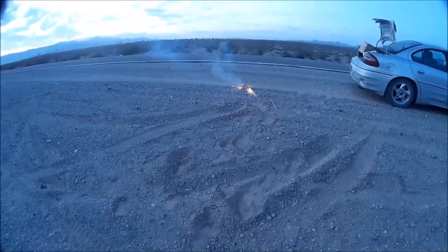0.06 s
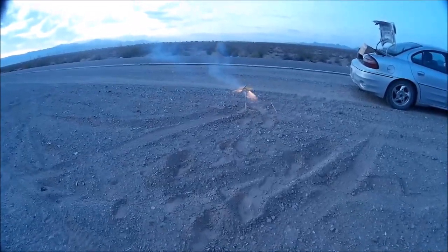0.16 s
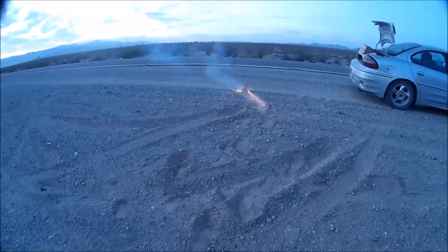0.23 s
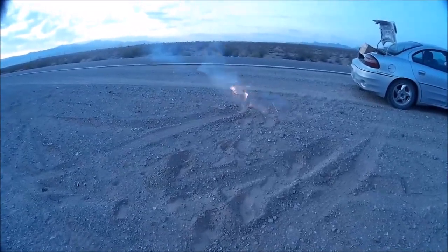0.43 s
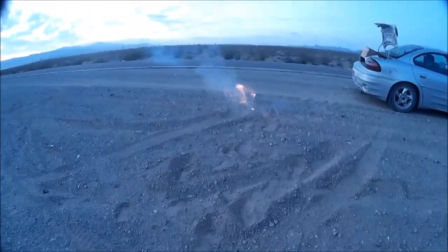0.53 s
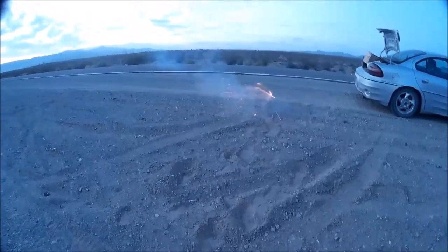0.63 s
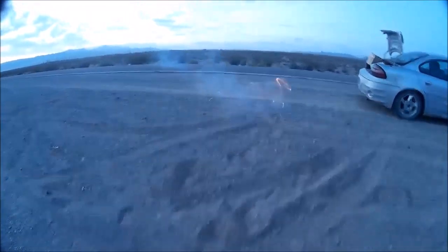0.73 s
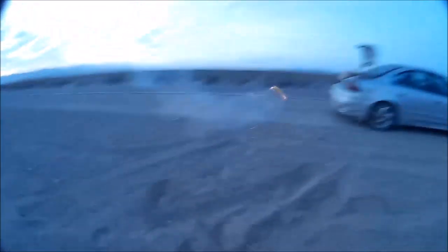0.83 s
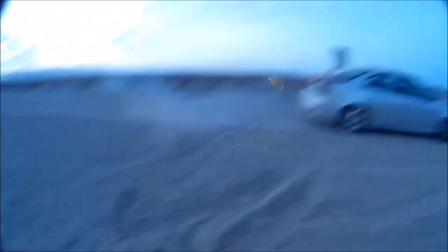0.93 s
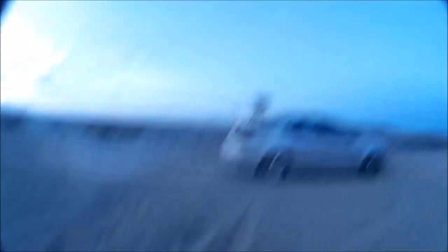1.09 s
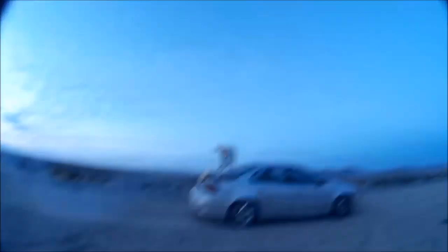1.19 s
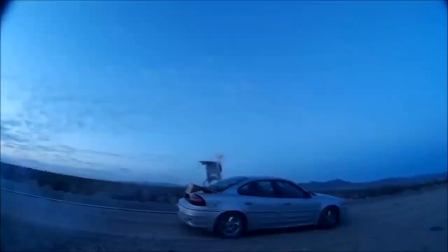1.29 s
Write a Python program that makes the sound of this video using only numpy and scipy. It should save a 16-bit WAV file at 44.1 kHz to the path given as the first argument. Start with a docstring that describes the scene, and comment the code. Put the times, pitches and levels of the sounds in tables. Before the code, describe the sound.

A small firework fizzes alight on the ground outdoors, then hisses in quickening surges with a rough howl and a few spitting pops. The rush dies down as it spins away from the microphone, leaving a bright fizz.

```python
"""A thin hiss swells to a surging, crackling rush: a spinning firework catches and flies away.
It starts on open gravel, heard from one fixed microphone in quiet evening air. The jet surges each time
the nozzle swings round, the flame howls, sparks fizz and the burning charge spits small pops.
The echo off the ground comes later as it climbs, which sweeps the colour of the rush downwards."""
import sys
import numpy as np
from scipy import signal
from scipy.fft import rfft, irfft
from scipy.io import wavfile

SR = 44100
rng = np.random.default_rng(int(sys.argv[2]) if len(sys.argv) > 2 else 0)


def file_out(sig):
    """Save sig as 16-bit WAV at sys.argv[1]."""
    # one column per channel
    cols = np.atleast_2d(sig).T
    # limit, then scale
    lim = np.clip(cols, -1, 1)
    pcm = np.round(lim * 32767).astype(np.int16)
    wavfile.write(sys.argv[1], SR, pcm)


N = 59535
T = np.arange(N) / SR

# colour of the jet's rush and the pops' cracks, as the microphone hears them: f/Hz, relative density/dB
RUSH_SPECTRUM = [(29, -59), (50, -24.5), (256, -39), (375, -19), (538, -8), (701, -7), (870, -3),
                 (1110, -1.5), (1470, -2.5), (1830, -4.5), (2020, -3), (2380, -4.5), (2820, -10.5),
                 (3580, -1), (3950, -0.5), (4670, -1), (7020, -12.5), (8110, -8), (9140, -15.5),
                 (10300, -5.5), (11300, -2), (13400, -12.5), (15500, -21)]


def from_db(db):
    """Decibels to gain."""
    return 10 ** (np.asarray(db) / 20)


def unit_rms(x):
    """Scale to an RMS of one."""
    return x / np.sqrt(np.mean(x ** 2) + 1e-20)


def in_time(rows):
    """Each column of a timed table at every sample."""
    times, *columns = np.transpose(rows)
    return [np.interp(T, times, column) for column in columns]


def coloured(noise, spectrum):
    """Give a steady noise a spectrum, at unit RMS."""
    hz, db = np.transpose(spectrum)
    bin_hz = np.maximum(np.arange(N // 2 + 1) * SR / N, 1)
    gain = from_db(np.interp(np.log(bin_hz), np.log(hz), db))
    return unit_rms(irfft(rfft(noise) * gain, N))


def butterworth(x, kind, hz, order=2):
    """A "low" or "high" pass filter."""
    return signal.sosfilt(signal.butter(order, hz, kind, fs=SR, output="sos"), x)


def split(x, hz):
    """The parts below and above a frequency; they add up to the whole."""
    low = signal.sosfiltfilt(signal.butter(3, hz, fs=SR, output="sos"), x)
    return low, x - low


def evening_air():
    """Faint hiss of the open site, and the low rumble of a breeze on the microphone."""
    # outdoor background: f/Hz, relative density/dB
    air_spectrum = [(15, -38), (25, -16), (113, -32), (144, -4), (160, 3), (313, 2), (433, -35), (552, -2),
                    (631, -7), (1490, -8.5), (2700, -22), (3630, -6), (6050, -24), (12200, -14),
                    (15500, -30)]
    rise_db_per_s, full_at_s = 29, 0.17   # the breeze picks up, then holds
    rumble = unit_rms(butterworth(rng.standard_normal(N), "low", hz=68))
    rumble_db = -55 + rise_db_per_s * np.minimum(T - full_at_s, 0)
    hiss = coloured(rng.standard_normal(N), air_spectrum)
    return from_db(-61.5) * hiss + from_db(rumble_db) * rumble


def turbulence():
    """Smooth gas noise mixed with the tiny cracks of burning grains."""
    cracks_per_s, spread_db = 2500, 2
    sizes = from_db(spread_db * np.minimum(rng.exponential(1, N), 5))
    signs = rng.choice([-1, 1], N)
    cracks = unit_rms(sizes * signs * (rng.random(N) < cracks_per_s / SR))
    return coloured(rng.standard_normal(N) + from_db(-6.5) * cracks, RUSH_SPECTRUM)


def jet():
    """The jet follows the uneven burn and surges on every turn, the treble most because it is beamed."""
    # course of the burn: t/s, level/dB, extra low roar/dB, extra top sizzle/dB
    burn = [(0, -75, 25.5, -6), (.12, -59.5, 11, -7), (.2, -42.5, 12, 4), (.25, -30, 4, 3),
            (.3, -13, -6.5, -6), (.36, -19, 7.5, -2.5), (.44, -12, 4, -2.5), (.49, -18, 4.5, -5),
            (.57, -21, -1.5, -2), (.64, -20.5, -2, -3), (.73, -18, -2, -1), (.85, -16, 13, -5),
            (.94, -25.5, 16.5, -0.5), (.948, -20, 10.5, -1), (1.01, -21.5, 10, 0), (1.08, -25.5, 4, 1.5),
            (1.16, -31, 5, 0), (1.35, -33.5, -1, 2)]
    # the nozzle swings towards the microphone: t/s, surge of the hiss band/dB, half-width/s
    turns = [(0.408, 9.5, 0.02), (.527, 11.5, .012), (0.602, 9.5, 0.01), (0.671, 6.5, 0.0082),
             (0.708, 8, 0.011), (0.763, 10.5, 0.014), (0.817, 12, 0.0084), (.867, 9, .011),
             (0.912, 13, 0.0084), (0.953, 8, 0.0077), (1.002, 8, 0.0094), (1.039, 10, 0.0076),
             (1.082, 6, 0.0065), (1.12, 4, 0.013)]
    level_db, roar_db, sizzle_db = in_time(burn)
    surge_db = sum(db * np.exp(-.5 * ((T - at) / width) ** 2) for at, db, width in turns)
    flutter_db = 1.64 * unit_rms(butterworth(rng.standard_normal(N), "low", hz=73))
    roar, rest = split(turbulence(), hz=810)
    rush, rest = split(rest, hz=2770)
    hiss, sizzle = split(rest, hz=6100)
    beamed = (roar * from_db(roar_db + 0.31 * surge_db)
              + (rush + hiss) * from_db(surge_db)
              + sizzle * from_db(sizzle_db + 1.192 * surge_db))
    return from_db(level_db + flutter_db) * beamed


def with_ground_echo(direct):
    """The gravel sends a dull echo to the microphone, later as the firework gains height."""
    # the echo's delay during the climb: t/s, lag/ms
    climb = [(.2, 0.61), (.27, 0.68), (.31, 0.47), (.35, 1.1), (.39, 1), (.45, 1.17), (.6, 1.37),
             (.72, 1.9), (.85, 2.11), (1.0, 2.65), (1.35, 3.44)]
    lag_ms, = in_time(climb)
    dull, _ = split(direct, hz=2290)
    return direct + 0.27 * np.interp(T - lag_ms / 1000, T, dull)


def resonance(track, half_width_hz):
    """A broad resonance, driven by turbulence, that wanders in pitch."""
    hz, db = in_time(track)
    a, b = butterworth(rng.standard_normal((2, N)), "low", half_width_hz)
    phase = 2 * np.pi * np.cumsum(hz) / SR
    return from_db(db) * unit_rms(a * np.cos(phase) + b * np.sin(phase))


def flame():
    """The flame sounds in three gliding bands of noise: a rush, a howl and the hiss of ignition."""
    # low rush of the flame: t/s, f/Hz, level/dB
    low_rush = [(.12, 400, -65.5), (.22, 420, -43), (.29, 380, -35), (.37, 250, -38.5), (.44, 230, -29.5),
                (.49, 210, -34.5), (.535, 350, -30.5), (.6, 380, -62), (.7, 500, -41), (.85, 450, -26.5),
                (.95, 400, -35.5), (1.06, 420, -44), (1.2, 420, -55)]
    # howl in the nozzle: t/s, f/Hz, level/dB
    howl = [(.1, 1600, -65), (.19, 1550, -43.5), (.25, 1550, -24.5), (.3, 1650, -20.5), (.35, 1650, -34),
            (.38, 995, -27), (.402, 1019, -16), (.425, 1500, -17), (.442, 1700, -10.5), (.463, 1200, -20),
            (.49, 900, -27.5), (.6, 750, -30), (.72, 600, -27), (.8, 602, -33), (.86, 850, -27),
            (.92, 950, -48), (1.01, 998, -27), (1.15, 984, -46), (1.35, 1012, -44.5)]
    # thin hiss as the nozzle catches: t/s, f/Hz, level/dB
    ignition = [(.1, 3749, -63), (.18, 3625, -48.5), (.24, 3900, -20.5), (.275, 4610, -19.5),
                (.3, 4435, -14), (.34, 3980, -19.5), (.39, 3560, -32), (.45, 3730, -60)]
    return (resonance(low_rush, half_width_hz=75)
            + resonance(howl, half_width_hz=175)
            + resonance(ignition, half_width_hz=710))


def sparks():
    """A bright, even fizz from the sparks left behind."""
    # strength of the spark trail: t/s, level/dB
    trail = [(.15, -70), (.32, -20), (.6, -29.5), (1.05, -25), (1.2, -32), (1.35, -30.5)]
    # colour of the fizz: f/Hz, relative density/dB
    fizz_spectrum = [(2000, -40), (4500, -21), (6000, 2), (7300, -1), (9000, -3.5), (11000, -30),
                     (15500, 0.5)]
    level_db, = in_time(trail)
    return from_db(level_db) * coloured(rng.standard_normal(N), fizz_spectrum)


def pops():
    """Each spit of the charge is a rough, heavily damped puff of gas with a short bright crack."""
    # spits: t/s, level/dB, puff f/Hz, extra gain of the crack/dB
    spits = [(.1675, -40, 700, 9.5), (.243, -19, 520, 15), (.436, -7, 540, 0), (.4635, -17, 200, 6),
             (.844, -9, 700, 1), (.848, -10, 700, -2), (.8585, -8, 1300, 0), (.880, -5, 750, -1),
             (.9115, -3, 1700, -3), (.914, -6, 900, -3), (.9445, -11, 410, 11.5), (1.099, -19, 560, -1),
             (1.237, -40, 900, 29)]
    rise_cycles, crack_decay_s = .5, .0014
    crack_noise = coloured(rng.standard_normal(N), RUSH_SPECTRUM)
    grit = rng.standard_normal(N)
    out = np.zeros(N)
    for start, db, hz, crack_db in spits:
        age = np.maximum(T - start, 0)
        swell = age * hz / rise_cycles
        roughness = .45 * unit_rms(butterworth(grit, "low", 2 * hz))
        puff = (np.sin(2 * np.pi * hz * age) + roughness) * swell * np.exp(1 - swell)
        puff = butterworth(puff + 1e-18 * grit, "high", .45 * hz)   # the trace of grit averts underflow
        crack = .5 * crack_noise * (T > start) * np.exp(-age / crack_decay_s)
        out += from_db(db) * (puff + from_db(crack_db) * crack)
    return out


def housing(x):
    """The microphone's housing rings in a few narrow bands and hollows out others."""
    # rings and hollows: f/Hz, width/Hz, gain/dB
    bands = [(1010, 110, 1.5), (1270, 120, 1), (2034, 47, 3.5), (2745, 530, -4), (3690, 98, 4),
             (3960, 59, 0), (4420, 180, -1), (5314, 50, 5.5), (7540, 110, -4)]
    for hz, width, db in bands:
        band = signal.lfilter(*signal.iirpeak(hz, hz / width, fs=SR), x)
        x = x + (from_db(db) - 1) * band
    return x


def scene():
    """The firework and the open air at one microphone, the same in both channels."""
    mono = with_ground_echo(jet()) + flame() + sparks() + pops() + evening_air()
    return np.tile(mono, (2, 1))


def record(dry):
    """The housing colours the sound, the loudest surges overload, the bass and the top are cut."""
    ceiling, top_hz = .95, 15700
    x = housing(dry)
    rounded = x / (1 + (x / ceiling) ** 8) ** .125
    thinned = butterworth(rounded, "high", hz=120, order=1)   # wind filter
    return signal.sosfiltfilt(signal.ellip(8, .05, 60, top_hz, fs=SR, output="sos"), thinned)


dry = scene()
out = record(dry)
file_out(out)
```